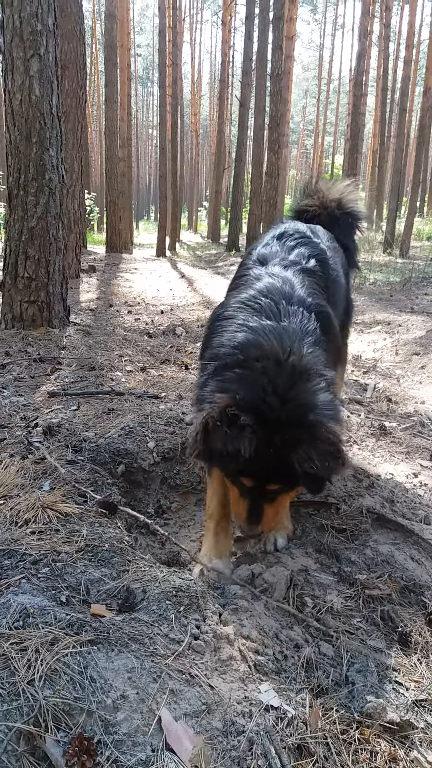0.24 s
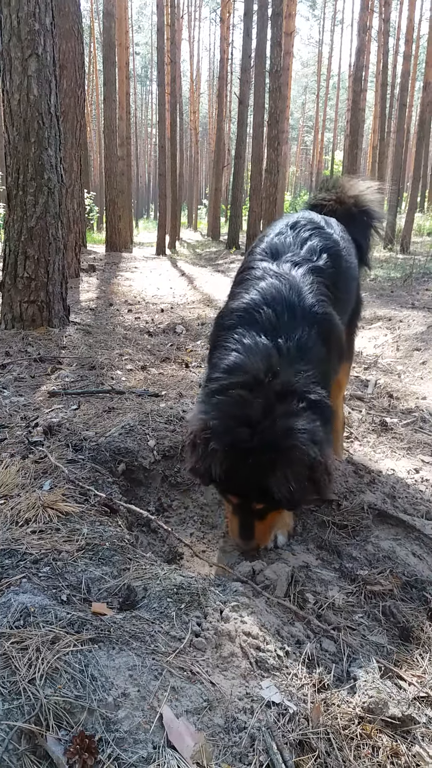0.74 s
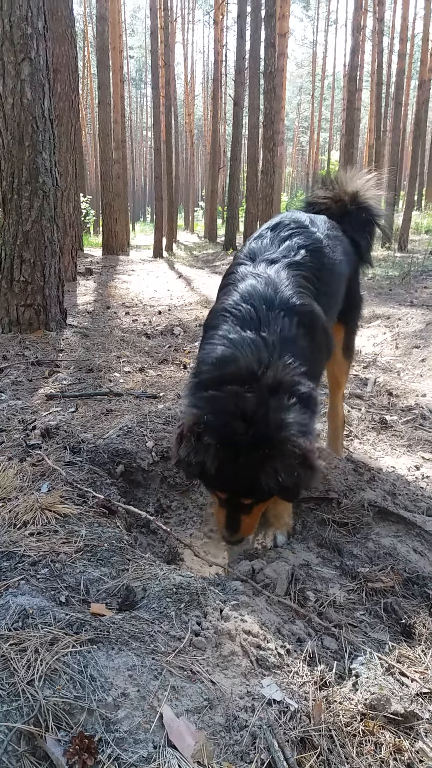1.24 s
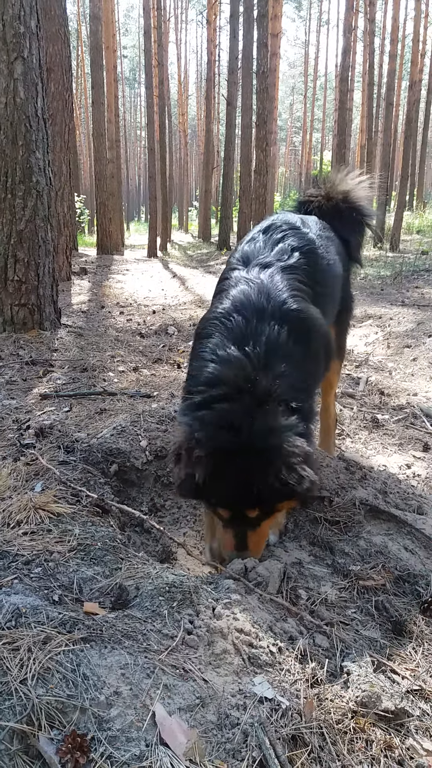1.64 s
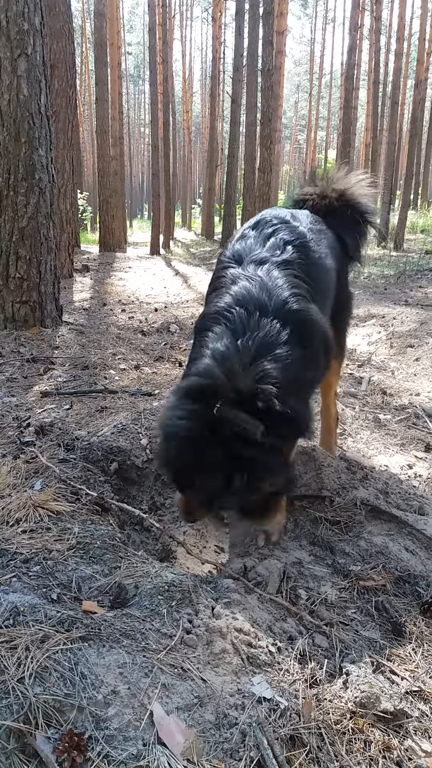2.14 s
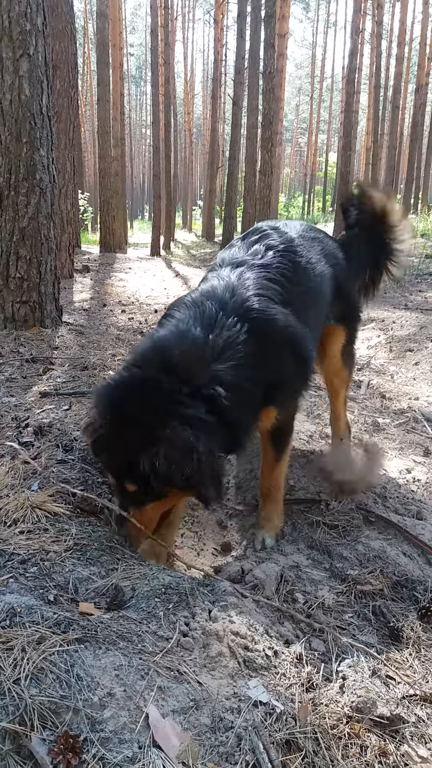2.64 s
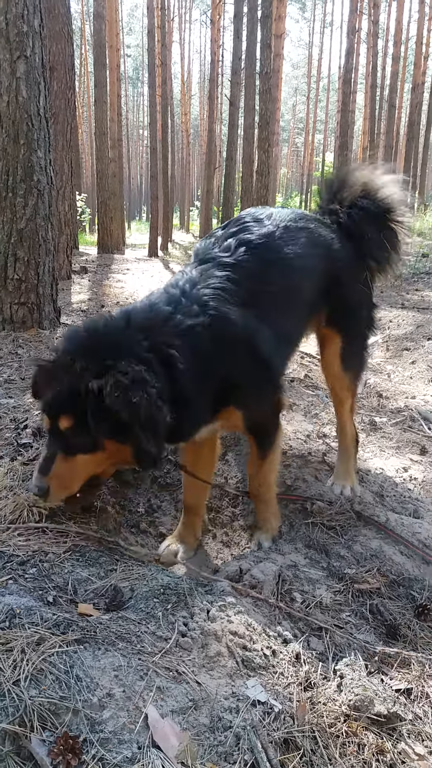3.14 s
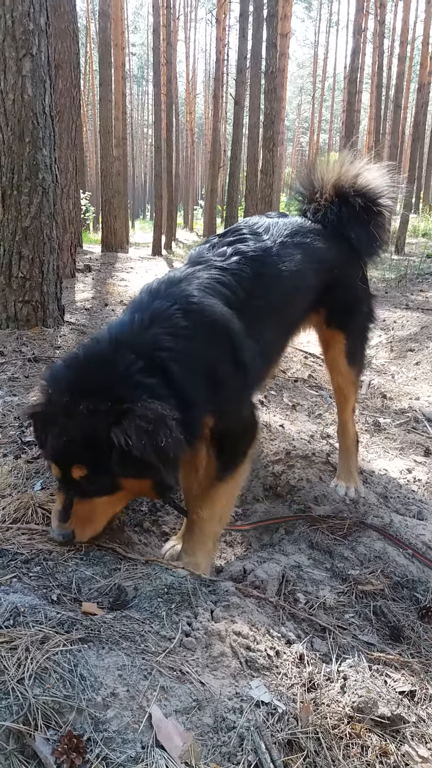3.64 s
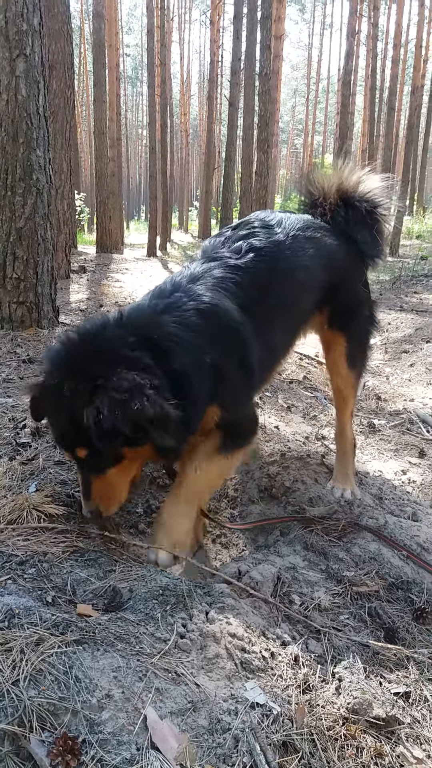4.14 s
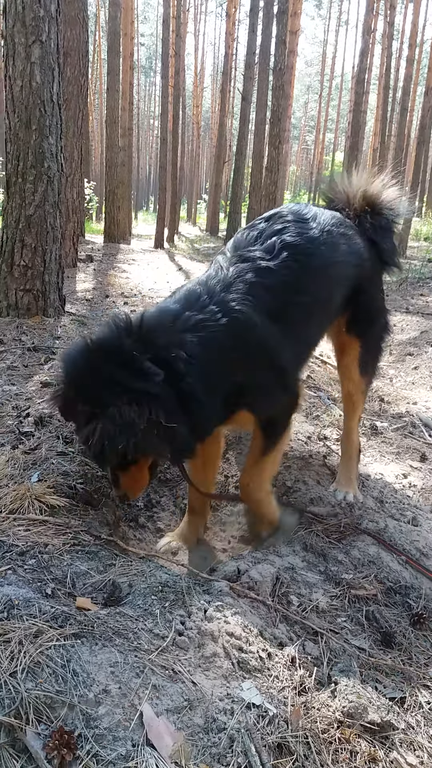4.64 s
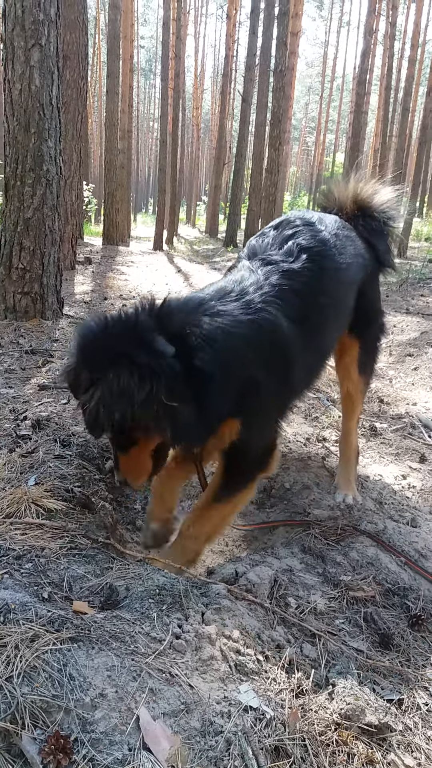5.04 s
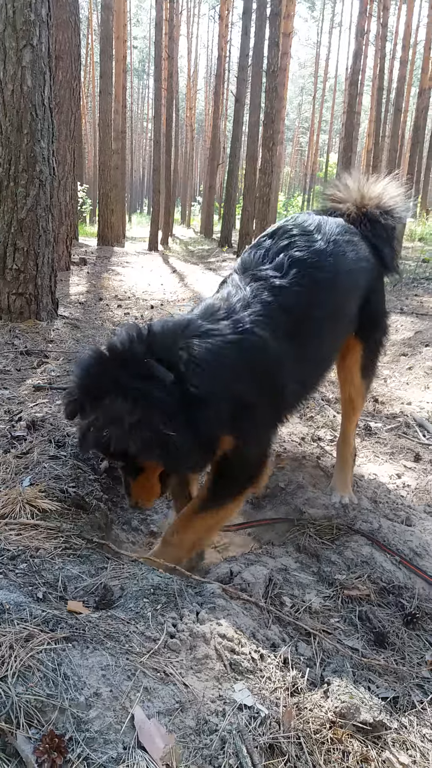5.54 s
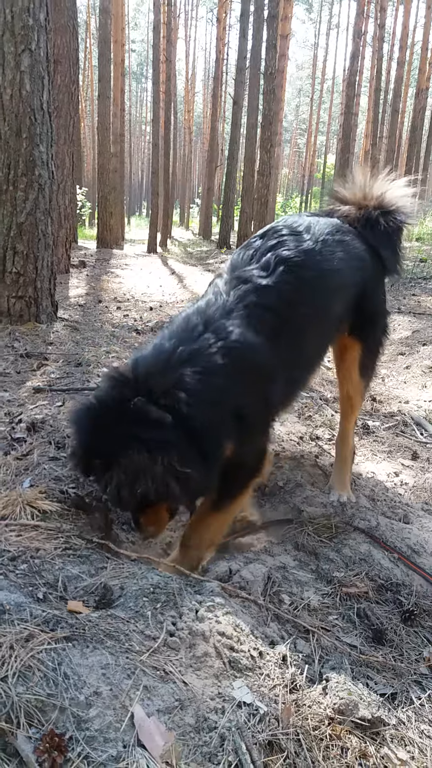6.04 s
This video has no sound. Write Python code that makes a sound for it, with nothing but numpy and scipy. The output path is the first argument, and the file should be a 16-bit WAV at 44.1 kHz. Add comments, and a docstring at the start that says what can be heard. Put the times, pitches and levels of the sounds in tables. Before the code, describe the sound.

Close sniffs, snapping twigs, trickling sand and dull paw scrapes in a quiet pine wood, with a thin falling bird call and a finch strophe.

```python
"""Paws thud and scrape in sandy soil, sand trickles and a dog sniffs in its hole, in a quiet pine forest.
A small bird repeats a thin falling call, a finch sings one strophe, others answer far off; a low rumble lies below.
Ringing modes and filtered noise make the paws, twigs and breath; coloured random clicks make sand, raking and a snort.
Sines that follow pitch curves make the birds, sparse echoes with a noise tail the forest; noise and tones the rest."""
import sys
import numpy as np
from scipy import signal
from scipy.fft import rfft, irfft
from scipy.io import wavfile

SR = 44100
rng = np.random.default_rng(int(sys.argv[2]) if len(sys.argv) > 2 else 0)


def master(y):
    """Save y as 16-bit WAV."""
    cut = np.clip(np.atleast_2d(y).T, -1, 1)
    pcm = np.round(cut * 32767)  # scale
    wavfile.write(sys.argv[1], SR, pcm.astype(np.int16))


N = 276886  # length in samples


def from_db(db):
    """Decibels to amplitude gain."""
    return 10 ** (np.asarray(db) / 20)


def rms_one(x):
    """Scale to unit rms."""
    return x / np.sqrt(np.mean(x ** 2) + 1e-20)


def in_time(rows, size=N):
    """Read each column of a breakpoint curve at every sample."""
    s, *columns = np.transpose(rows)
    t = np.arange(size) / SR
    return [np.interp(t, s, column) for column in columns]


def add(track, s, sound):
    """Mix a sound into a track at a given time in seconds."""
    start = max(0, int(s * SR))
    track[start:start + len(sound)] += sound[:max(0, N - start)]


def coloured(x, spectrum):
    """Shape a steady signal by a spectrum that falls 36 dB per octave beyond its ends; rms 1."""
    hz, db = np.transpose(spectrum)
    octave = np.log2(np.fft.rfftfreq(N, 1 / SR) + 1)
    points = np.log2(hz)
    outside = np.abs(octave - np.clip(octave, points[0], points[-1]))
    gain = from_db(np.interp(octave, points, db) - 36 * outside)
    return rms_one(irfft(rfft(x) * gain, N))


def drift(rate, size=N):
    """Smooth chance with a spread near 1: random knots, rate per second, joined by lines."""
    knots = rng.standard_normal(1024)
    return np.interp(np.arange(size) * rate / SR, np.arange(len(knots)), knots)


def resonance(x, hz, width_hz):
    """A two-pole resonance with gain near 1 at its top."""
    r = np.exp(-np.pi * width_hz / SR)
    feed = np.array([1, 0, -1]) * (1 - r * r) / 2
    return signal.lfilter(feed, [1, -2 * r * np.cos(2 * np.pi * hz / SR), r * r], x)


def grains(per_s, spread_db):
    """Random clicks of very uneven size and either sign."""
    sizes = from_db(spread_db * np.minimum(rng.exponential(1, N), 4))
    happens = rng.random(N) < per_s / SR
    return happens * sizes * rng.choice([-1, 1], N)


def swell(length):
    """A rounded rise and fall, half a sine, over a length in seconds."""
    return np.sin(np.linspace(0, np.pi, int(length * SR)))


def whistle(hz):
    """A sine of rms 1 that follows a pitch."""
    return np.sqrt(2) * np.sin(2 * np.pi * np.cumsum(hz) / SR)


def forest(x, t60, echo_db, rise_s=0.005, count=160):
    """Each trunk throws back one faint echo; a diffuse noise tail fills the gaps. Returns the echo alone."""
    t = np.arange(2 * SR) / SR
    trunks = np.zeros(len(t))
    trunks[rng.integers(0, len(t), count)] = rng.standard_normal(count)
    tail = rng.standard_normal(len(t))
    envelope = from_db(-60 * t / t60) * (1 - np.exp(-t / rise_s))
    echoes = (rms_one(trunks) + tail) * envelope
    return from_db(echo_db) * signal.fftconvolve(x, echoes / np.linalg.norm(echoes))[:N]


def branches(x, spread_s=0.08, scatter_db=-1.0):
    """Twigs and needles near a singer scatter its notes and blur their edges."""
    return 0.6 * x + forest(x, t60=spread_s, echo_db=scatter_db, rise_s=0.001)


def repeated(times, contour, vary=0.005):
    """One note shape sung again and again, its sweep now deeper, now shallower."""
    out = np.zeros(N)
    hz, shape_db = in_time(contour, size=int(contour[-1][0] * SR))
    middle = np.median(hz)
    for s, db, depth in times:
        sung = middle + depth * (hz - middle)
        unsteady = sung * (1 + vary * drift(125.4, size=len(hz)))
        add(out, s, from_db(db + shape_db) * whistle(unsteady))
    return out


def slurred(notes, bend, waver=0.014, low_end_db=-3.0):
    """Each note glides from first to last pitch, swells and fades; low_end_db tilts its level toward the low end."""
    out = np.zeros(N)
    for s, length, first, last, db in notes:
        hz = last + (first - last) * np.linspace(1, 0, int(length * SR)) ** bend
        lowness = (max(first, last) - hz) / (abs(first - last) + 1)
        effort = np.abs(swell(length)) ** 0.75 * from_db(db + low_end_db * lowness ** 2)
        add(out, s, effort * whistle(hz * (1 + waver * drift(320, size=len(hz)))))
    return out


def phrase(motif, start_s, every_s, change, count):
    """An evenly paced motif; pitches and level move by the same step each time, and a little by chance."""
    pitch_varies, level_varies_db = 0.015, 1.3  # spread of chance: share of the pitch, and dB
    notes = np.tile(np.array(motif, float), (count, 1, 1))
    turn = np.arange(count)[:, None, None]
    notes[:, :, :1] += start_s + every_s * turn
    notes[:, :, 2:] += np.array(change) * turn
    notes[:, :, 2:4] *= 1 + pitch_varies * rng.standard_normal((count, len(motif), 2))
    notes[:, :, 4] += level_varies_db * rng.standard_normal((count, len(motif)))
    return np.concatenate(notes)


def background(rumble_db=-2.0, drone_waver_hz=1.077):
    """Still air with a fine hiss, and a far rumble that holds a few unsteady tones."""
    # spectrum of still air and hiss: f/Hz, relative level/dB
    air_colour = [(120, -35), (200, -3.5), (298, -4.5), (339, -5.5), (378, -8), (454, -9), (798, -11),
                  (992, -8), (2130, -18.5), (2650, -22), (3550, -26.5), (3890, -27), (5490, -33),
                  (7220, -29.5), (15500, -28.5)]
    # spectrum of the far rumble: f/Hz, relative level/dB
    rumble_colour = [(25, -25), (35, -35), (52, -8.5), (72, -0.5), (88, 2), (110, -4), (135, -8), (175, -9),
                     (220, -16.5), (300, -25)]
    # shared fader of rumble and drone: t/s, level/dB
    rumble_fader = [(0.0, -57), (0.72, -52.5), (5.59, -51), (6.2, -51)]
    # drone tones within the rumble: f/Hz, level under the fader/dB
    drone_tones = [(72, -11.5), (86, -9.5), (104.8, -5.5)]
    level_db, = in_time(rumble_fader)
    rumble = from_db(rumble_db) * coloured(rng.standard_normal(N), rumble_colour)
    drone = np.zeros(N)
    for hz, db in drone_tones:
        tone_gain = from_db(db + 0.62 * drift(7.0))
        drone += tone_gain * whistle(hz + drone_waver_hz * drift(6))
    air = from_db(-60.5) * coloured(rng.standard_normal(N), air_colour)
    return from_db(level_db) * (rumble + drone) + air


def far_song(notes_per_s=30.0, unrest=0.3, fullness=0.31):
    """Quick, uneven falling notes, heard only by way of the trunks; each song swells, shifts in pitch and fades."""
    # songs whose notes run together: t/s, length/s, first centre f/Hz, last centre f/Hz, note span/Hz, level/dB
    far_songs = [(0, 0.8, 3050, 2912, 986, -65), (1.12, 1.39, 3500, 2989, 1895, -61),
                 (2.299, 0.66, 2950, 3015, 1196, -63), (3.57, .72, 3480, 3196, 708, -67.5),
                 (4.88, 0.95, 3850, 3500, 2210, -66.5), (5.55, 0.83, 3147, 2916, 1518, -68)]
    out = np.zeros(N)
    for s, length, first, last, span, db in far_songs:
        effort = np.abs(swell(length)) ** fullness
        pace = notes_per_s * np.exp(unrest * drift(25, size=len(effort)))
        cycle = np.cumsum(pace) / SR % 1  # place within the current note
        hz = np.linspace(first, last, len(effort)) + span * (0.5 - cycle)
        notes = np.sqrt(np.sin(np.pi * cycle)) * whistle(hz)
        add(out, s, from_db(db) * effort * rms_one(notes))
    return forest(out, t60=0.36, echo_db=-3.5, rise_s=0.03)


def scraping(trickle_db=-86.5):
    """Claws rake up coarse grains; thrown sand patters down in clumps and keeps sliding back between throws."""
    # claws raking the soil: t/s, length/s, level/dB
    rake_strokes = [(1.119, 0.12, -58), (1.71, 0.12, -57), (4.7, 0.094, -68), (5.004, 0.1, -54.5),
                    (5.14, 0.19, -64.5), (5.419, 0.11, -56.5), (5.624, 0.16, -60), (5.784, 0.082, -54),
                    (6.077, 0.098, -59)]
    # throws of loose sand over dry litter: t/s, length/s, level before clumping/dB
    sand_throws = [(0.15, 0.042, -67), (0.326, 0.12, -65), (2.475, 0.27, -75.5), (2.82, 0.59, -74.5),
                   (5.025, .055, -70), (5.317, 0.46, -81), (6.053, .28, -75)]
    # spectrum of falling sand: f/Hz, relative level/dB
    sand_colour = [(2500, -4.5), (5500, -11), (7100, -2.5), (8300, -8.5), (10500, -19), (13000, -20),
                   (15500, -16)]
    # spectrum of raked soil: f/Hz, relative level/dB
    rake_colour = [(150, 3), (450, -4.5), (1000, -8), (1800, -12.5), (3000, -19), (6000, -34)]
    stroke = np.zeros(N)
    for s, length, db in rake_strokes:
        add(stroke, s, from_db(db) * swell(length))
    flow = np.full(N, from_db(trickle_db))
    for s, length, db in sand_throws:
        add(flow, s, from_db(db) * swell(length))
    clumps = from_db(4.5 * drift(60))
    sand = coloured(grains(per_s=1900, spread_db=3.5), sand_colour) * flow * clumps
    raked = coloured(grains(per_s=1600, spread_db=2.5), rake_colour) * stroke
    return raked + sand


def neighbours():
    """Other singers glide through repeated motifs farther off, with a long echo."""
    # motifs, one per singer: t in the motif/s, length/s, first f/Hz, last f/Hz, level before the shared gain/dB
    thin_note = [(0.0032, .034, 7650, 4200, -73)]
    rising_whistle = [(0.00036, .066, 2650, 3350, -65)]
    warble = [(0, 0.0174, 3276, 2640, -62), (.042, 0.0168, 2634, 3310, -61.5)]
    arch = [(0, .028, 2643, 3360, -71), (.03, 0.0417, 3380, 2710, -67.5)]
    # single slurs and held whistles: t/s, length/s, first f/Hz, last f/Hz, level before the shared gain/dB
    far_slurs = [(2.8, 0.078, 4330, 4280, -73), (3.016, 0.023, 3224, 2740, -62.5),
                 (3.08, 0.21, 3410, 3280, -72), (3.355, 0.045, 3250, 2740, -69),
                 (3.598, .68, 3420, 3530, -72.5), (6.012, .06, 4400, 4340, -77)]
    # change per repeat: first Hz, last Hz, dB
    notes = [*phrase(thin_note, start_s=0.046, every_s=0.121, change=(0, 0, 4), count=4),
             *phrase(rising_whistle, start_s=0.093, every_s=0.23, change=(0, 0, 2), count=3),
             *phrase(warble, start_s=2.508, every_s=0.093, change=(0, 0, -0.6), count=5),
             *phrase(arch, start_s=5.51, every_s=0.133, change=(0, 0, 0.5), count=5), *far_slurs]
    sung = from_db(1.5) * slurred(notes, bend=1.092, waver=0.0175, low_end_db=1.0)
    far = branches(sung, spread_s=0.055, scatter_db=-5.0)
    return far + forest(far, t60=1.6, echo_db=-4.0, rise_s=0.019)


def nose(nostril_db=-2.5, upper_db=-3.5, hollow_db=-2.0, snort_db=5.0):
    """Air rushes through two nostril resonances and sounds the hollow under the muzzle; one snort clears out sand."""
    # sniffs: t/s, length/s, level before the band trims/dB, nostril f/Hz
    sniffs = [(0.09, 0.065, -67, 1810), (0.273, 0.073, -61.5, 1920), (0.353, 0.068, -64, 1760),
              (0.5, 0.06, -59.5, 1770), (0.588, 0.03, -63.5, 1760), (0.723, 0.056, -59, 1710),
              (1.029, 0.04, -61.5, 1834), (1.219, 0.073, -54.5, 1700), (1.305, 0.061, -65, 1710),
              (1.482, 0.035, -65, 1700), (2.738, 0.067, -63.5, 1750), (2.939, 0.074, -59, 1820),
              (4.827, 0.03, -64, 1780), (5.02, 0.065, -56.5, 1720), (5.264, 0.045, -58.5, 1700),
              (6.092, 0.05, -58.5, 2115), (6.201, 0.062, -56, 1520)]
    # envelope of the snort: t/s, level before snort_db/dB
    snort_curve = [(2.92, -87), (2.95, -63.5), (2.975, -54.5), (2.995, -56), (3.015, -66), (3.05, -101)]
    # spectrum of the snort: f/Hz, relative level/dB
    snort_colour = [(900, -3.5), (1350, -3), (1700, 3.5), (2200, -10), (3200, -2), (4200, -11.5),
                    (5600, -12), (7000, -3), (8800, -10), (9700, -9.5), (11500, -22), (15500, -20)]
    out = np.zeros(N)
    for s, length, db, hz in sniffs:
        flow = swell(length)
        # the hole sounds with every sniff, 5 dB less once the muzzle is lifted out of it
        hole_db = -58 - 5 * (s > 4.4)
        # bands: centre Hz, width of each filter pass Hz, level dB
        bands = [(hz, 480, db + nostril_db), (hz * 1.293, 700, db + upper_db), (465, 200, hole_db + hollow_db)]
        for centre, width, level in bands:
            breath = rng.standard_normal(len(flow))
            rush = resonance(resonance(breath, centre, width), centre, width)
            add(out, s, from_db(level) * flow * rms_one(rush))
    blast_db, = in_time(snort_curve)
    snort = coloured(grains(per_s=6800, spread_db=2.5), snort_colour)
    return out + from_db(blast_db + snort_db) * snort


def snaps(knock_db=-4.5, crack_db=10.0, decay_s=0.00088):
    """Dry needles and twigs break with a woody knock and a short, bright crack, both filtered noise bursts."""
    # snaps: t/s, knock level before knock_db/dB, crack level before crack_db/dB
    twig_snaps = [(0.2386, -39, -67), (0.6102, -31.5, -62), (1.986, -40, -59), (2.5255, -38, -57),
                  (2.5377, -46, -61), (2.8893, -55, -60), (2.911, -60, -59), (3.0944, -56, -64),
                  (3.1813, -57, -62), (4.9834, -50, -76), (5.347, -40, -77), (6.162, -44, -76)]
    out, t = np.zeros(N), np.arange(SR // 40) / SR
    for s, woody_db, bright_db in twig_snaps:
        # bands: centre Hz, width of each filter pass Hz, peak dB
        for hz, width, db in [(2550, 2060, woody_db + knock_db), (7000, 3200, bright_db + crack_db)]:
            burst = rng.standard_normal(len(t)) * np.exp(-t / decay_s)
            crack = resonance(resonance(burst, hz, width), hz, width)
            add(out, s, from_db(db) * crack / np.abs(crack).max())
    return out


def caller(later_echo_db=5.5, moves_s=3.0):
    """A thin falling call; the bird moves off, so its later calls hold more echo."""
    # calls: t/s, level before the call's gain/dB, sweep depth/share of the contour
    call_times = [(0.26, -50.5, 1), (0.964, -52, 0.9), (1.46, -50, 0.95), (2.652, -55.5, 0.96),
                  (3.441, -63.5, 1), (4.527, -66, 0.61), (5.172, -67, 0.52), (5.942, -65.5, 0.55)]
    # contour of one call: t in the call/s, f/Hz, relative level/dB
    call_contour = [(0, 5900, -27), (.007, 5850, -6), (.017, 5520, -3.5), (.026, 5240, 3.5),
                    (.038, 5090, 2.5), (.05, 5230, -8)]
    call = from_db(-1.0) * repeated(call_times, call_contour, vary=0.012)
    away = np.clip((np.arange(N) / SR - moves_s) / 0.2, 0, 1)
    spread = call * from_db(later_echo_db * away)
    near_trunks = forest(spread, t60=0.61, echo_db=-3.5, rise_s=0.0075, count=900)
    far_trunks = forest(spread, t60=0.93, echo_db=-10.0, rise_s=0.04, count=900)
    return call + near_trunks + far_trunks


def finch():
    """One strophe of gliding notes: two syllables, an even trill, a sinking motif, two more; a few slurs nearby."""
    # syllables outside the trill: t/s, level before the trill's gain/dB, sweep depth/share of the contour
    lone_syllables = [(0.482, -58.5, 0.96), (0.564, -59.5, 1.2), (2.196, -60.5, 1.24), (2.256, -57.5, 1.02)]
    # contour of one syllable: t in the syllable/s, f/Hz, relative level/dB
    syllable = [(0, 4220, -16), (.007, 4254, -2), (.013, 4300, -12), (.018, 5025, -3), (0.024, 5675, -7.5),
                (0.026, 5050, 3.5), (.032, 4530, 2.5), (.037, 4280, -27)]
    # motif (down, up, low): t in the motif/s, length/s, first f/Hz, last f/Hz, level before the shared gain/dB
    motif_notes = [(.001, .036, 5110, 4160, -52.5), (.04, .022, 3745, 5300, -53.5),
                   (.078, 0.0217, 3203, 2550, -56.5)]
    # what each motif note gains per repeat: first f/Hz, last f/Hz, level/dB
    motif_change = [(40, -190, -1.37), (-195, -250, -0.83), (-49.5, -37, 0.5)]
    # single slurred notes nearby: t/s, length/s, first f/Hz, last f/Hz, level before the shared gain/dB
    near_slurs = [(2.335, 0.04, 4500, 2410, -58), (2.458, 0.026, 5900, 4750, -69),
                  (6.204, 0.026, 7600, 5830, -69), (6.227, 0.029, 7200, 4620, -66.5)]
    run = [(0.626 + k * 0.0614, -56.5, 1) for k in range(7)]  # s, dB, depth
    trill = from_db(1.0) * repeated(run + lone_syllables, syllable, vary=0.0184)
    notes = phrase(motif_notes, start_s=1.066, every_s=0.1625, change=motif_change, count=7)
    glides = from_db(0.5) * slurred([*notes, *near_slurs], bend=1.1, waver=0.026, low_end_db=-2.0)
    glides = branches(glides, spread_s=0.033, scatter_db=-3.5)
    echo = forest(glides + from_db(-2.0) * trill, t60=1.14, echo_db=-3.5, rise_s=0.0067)
    return branches(trill, spread_s=0.016, scatter_db=-3.0) + glides + echo


def paws(level_db=-1.5, give_s=0.0011, soft_hz=2700, grit_db=-11.0, grit_s=0.008):
    """A soft paw sets the soil ringing for a few cycles and crushes some grit."""
    # blows on the ground: t/s, level before level_db/dB, share of the deep thud/dB
    paw_blows = [(0.752, -41.5, -8), (1.499, -53, -5), (1.979, -46, -27), (1.984, -35.5, 0),
                 (5.202, -42, -2), (5.508, -35.5, 3.5), (5.534, -38.5, -2.5), (5.78, -36.5, -6),
                 (5.802, -44, 4), (5.841, -43.5, 1), (6.009, -28.5, -3.5)]
    # modes of the packed soil: f before random detuning/Hz, relative level/dB, t60/s
    soil_modes = [(142.3, 0.5, 0.042), (187.6, 3, 0.045), (304, -6.5, 0.033), (479, -3, 0.04),
                  (565, -1.5, 0.016), (956, -7.5, 0.017), (1360, -17, 0.043), (1710, -9, 0.02),
                  (2520, -8.5, 0.0064)]
    out, t = np.zeros(N), np.arange(SR // 8) / SR
    for s, db, thud_db in paw_blows:
        grit = resonance(rng.standard_normal(len(t)), 1000, 2000) * np.exp(-t / grit_s)
        blow = from_db(grit_db) * grit
        for k, (hz, mode_db, t60) in enumerate(soil_modes):
            if hz < 250:
                # the heavy soil takes a moment to give way
                weight = -from_db(thud_db) * (1 - np.exp(-t / give_s))
            else:
                weight = (-1) ** (k + 1) * from_db(rng.normal(0, 1.5))
            ringing = np.sin(2 * np.pi * hz * rng.uniform(0.96, 1.05) * t)
            blow += weight * from_db(mode_db - 60 * t / t60) * ringing
        add(out, s, from_db(db + level_db) * blow)
    return signal.sosfilt(signal.butter(3, soft_hz, fs=SR, output="sos"), out)


def birds():
    """Near and far singers together, each with its own echo; the far songs are echo alone."""
    return caller() + finch() + neighbours() + far_song()


def scene():
    """The dog close by and nearly dry, the birds around and above."""
    dog = paws() + scraping() + snaps() + nose()
    dog_echo = forest(dog, t60=0.4, echo_db=-14.0)
    return (dog + dog_echo + birds() + background())[None]


def record(dry):
    """The microphone drops the deepest bass; the top is cut steeply."""
    thinned = signal.sosfilt(signal.butter(3, 40, "high", fs=SR, output="sos"), dry)
    top_cut = signal.ellip(10, 0.1, 70, 15700, fs=SR, output="sos")  # 0.1 dB ripple, 70 dB stop, edge in Hz
    return signal.sosfilt(top_cut, thinned)


dry = scene()
out = record(dry)
master(out)
```